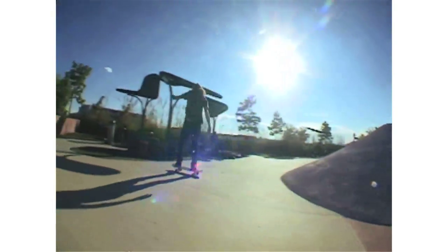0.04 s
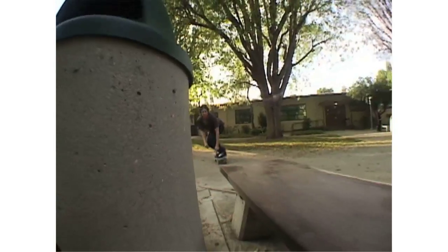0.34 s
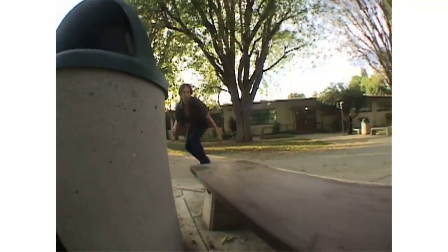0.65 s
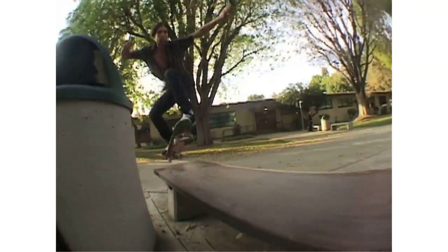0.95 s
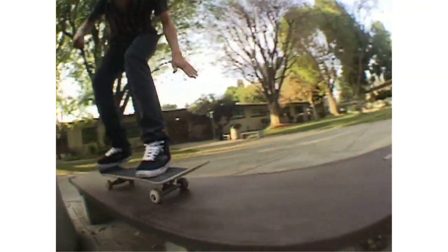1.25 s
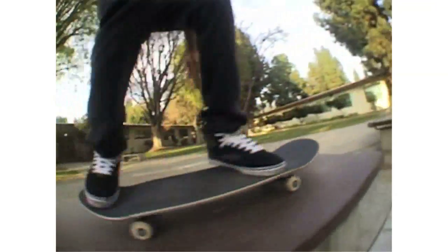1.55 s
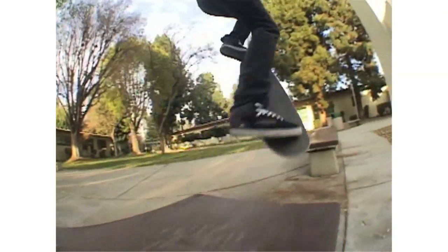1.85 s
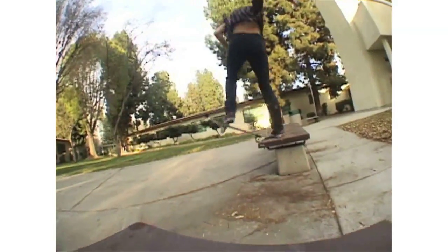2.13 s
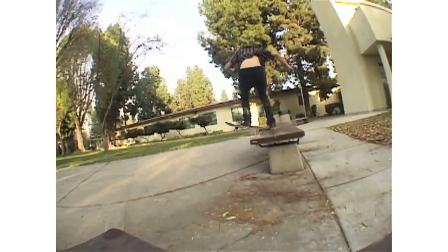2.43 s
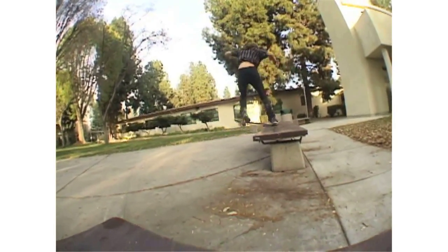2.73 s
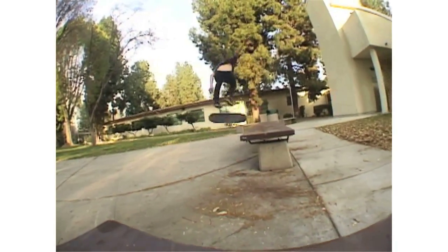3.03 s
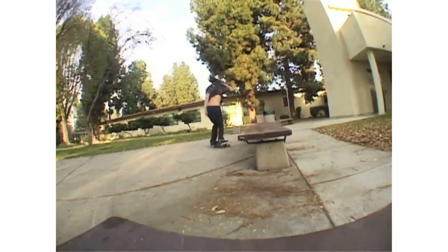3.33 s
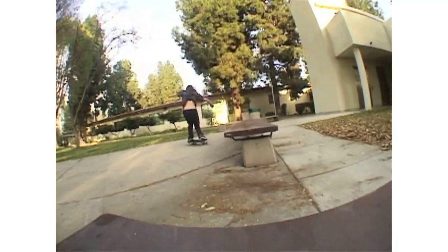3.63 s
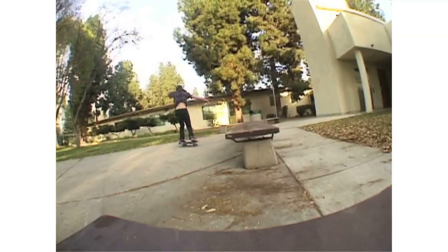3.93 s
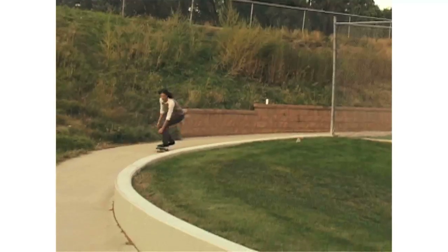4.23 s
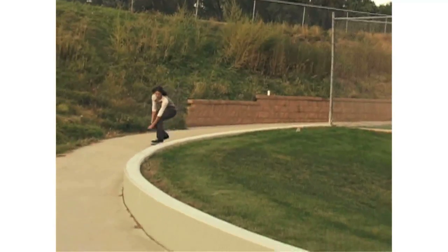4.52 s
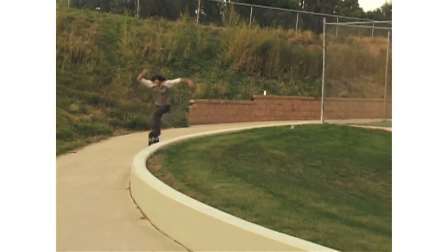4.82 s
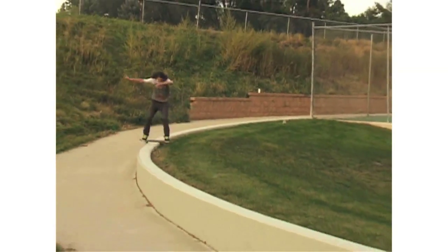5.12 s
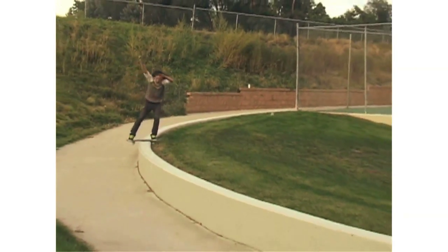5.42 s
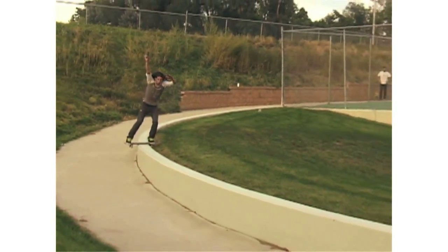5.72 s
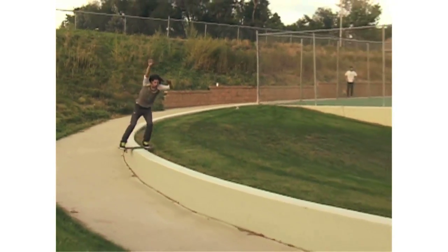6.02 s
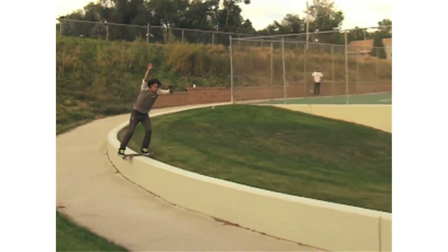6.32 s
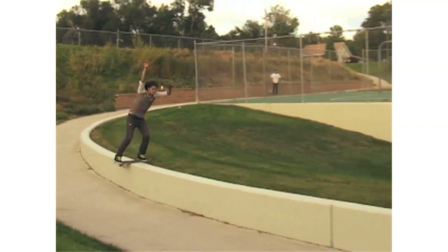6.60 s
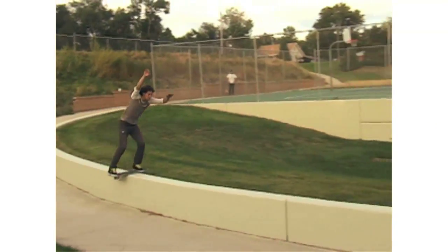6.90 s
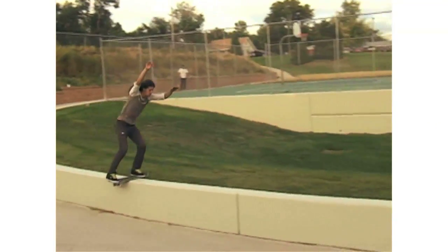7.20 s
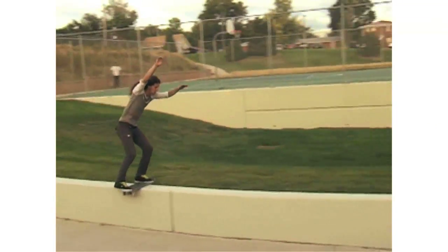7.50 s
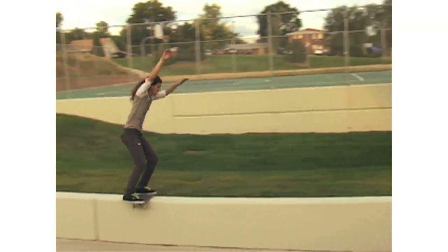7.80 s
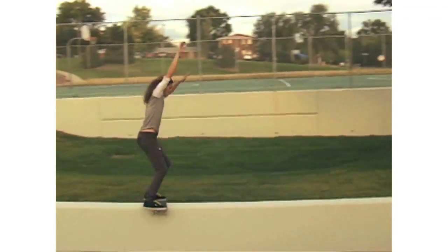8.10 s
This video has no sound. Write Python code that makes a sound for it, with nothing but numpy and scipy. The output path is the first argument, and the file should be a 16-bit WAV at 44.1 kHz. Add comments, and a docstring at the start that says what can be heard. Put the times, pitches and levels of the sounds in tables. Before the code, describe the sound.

A skateboard's wheels hum for an instant on smooth concrete, then rumble over gritty courtyard paving. At about 0.9 seconds the tail pops sharply, very close, and at 1.1 the board slams onto a bench; these are the loudest blows. The wheels rumble loudly past, with another wooden crack at 1.8. A landing clatters at 2.2, and softer knocks and slaps follow at 2.5, 2.8 and 3.3, echoing lightly as the rolling fades away.

At 4.1 seconds wheels roll softly along a concrete path under a faint, low breeze. A lighter pop comes at 4.9, and the metal truck lands on a concrete wall at 5.1. It chatters lightly, then digs in from 5.5 into a rough, gritty grind with a low rumble from the deck. Irregular metallic snags clank around 5.7, 6.4, 6.9 and 7.7. The grind continues, easing slightly, until the end just after 8 seconds.

```python
"""A moment of skateboard wheels humming on smooth concrete opens three outdoor runs. Next, in a
courtyard, the tail pops close by; the board rides a bench, lands and clatters away. Last comes a pop
onto a curved concrete wall and a long, rough grind. Wheels rumble over grit, blows ring the wooden
deck, and the metal truck sticks, slips and snags on the edge. Walls and trees echo over soft open air."""
import sys
import numpy as np
from scipy import signal
from scipy.fft import rfft, irfft
from scipy.io import wavfile
from scipy.ndimage import map_coordinates

SR = 44100
rng = np.random.default_rng(int(sys.argv[2]) if len(sys.argv) > 2 else 0)


def waveform_to_disk(signal):
    """Save audio, clipped to [-1, 1], as 16-bit WAV at the path in sys.argv[1]."""
    frames = np.transpose(np.atleast_2d(signal))
    scaled = np.clip(frames, -1, 1) * 32767
    samples = np.round(scaled).astype(np.int16)
    wavfile.write(sys.argv[1], SR, samples)


N = 359415
T = np.arange(N) / SR
TAPS = 4096
HZ = np.maximum(np.fft.rfftfreq(TAPS, 1 / SR), 1)

# stretches of rolling: start_s, end_s
PARK_SPAN, PAVING_SPAN, BENCH_SPAN = (-.1, .117), (.117, 1.1), (1.14, 2.14)
AWAY_SPAN, PATH_SPAN = (2.19, 4.1), (4.11, 5.08)
TURN_S = (5.9, 7)   # the curve of the wall turns the board side-on
# hard snags of the truck on the edge: start_s, peak_db, tilt_db_per_octave
SNAGS = [(5.1352, -28.5, 0), (5.366, -27, -1), (5.4705, -20.5, 0), (5.6127, -21.5, -3.5), (5.664, -17, -1),
         (5.686, -15, 2), (5.7175, -17, -2), (5.863, -18, -4), (6.3654, -19.5, -2), (6.6608, -20, -5),
         (6.8199, -16.5, 1.5), (6.8698, -15, 0), (6.9691, -19.5, -5), (7.7313, -17, -.5), (7.7838, -21, -1)]
# resonances of the truck on the wall: pitch_hz, width_hz, front_db, side_db
TRUCK_MODES = [(906, 175, -9, -0.5), (1126, 284, -4, 3.5), (1442, 285, 5.5, 2), (1730, 320, 1.5, -4),
               (2005, 390, 1.5, 4.5), (2500, 940, -9, -5.5), (3650, 510, -7.5, -11),
               (4270, 550, -11, -12.5), (5140, 830, -13.5, -23.5), (6100, 430, -27, -18.5),
               (6600, 290, -48.5, -56), (8730, 1800, -21.5, -22.5), (10700, 1100, -55.5, -55)]
# the rider's direction: time_s, left_lag_ms, blow_pan_db
DIRECTION = [(.3, -.03, 0), (1.1, -0.068, -.5), (1.6, 0.055, 0), (2.3, 0.04, -2.8), (3.2, 0.015, -1.5),
             (5, -0.022, 0)]


def board_blows():
    """Pops ring the free deck, other blows the loaded one; farther off they sound duller."""
    # the tail snaps on the ground: start_s, level_db, t60_s, tilt_db_per_octave
    pops = [(.855, -3, 0.047, -1.7), (.868, -12, 0.023, -2.5), (4.9225, -26.5, .03, 1.5),
            (4.927, -25.5, 0.052, 2.5)]
    # deck modes, free and under the rider, in the courtyard and by the wall: pitch_hz, width_hz, gain_db
    court_free = [(260, 110, -10.5), (530, 97, -11), (865, 120, -5), (1050, 130, -2.5), (1290, 140, -6),
                  (1593, 370, 4), (1747, 150, 4.5), (2326, 130, -0.5), (3214, 500, -16.5), (4200, 600, -14),
                  (5350, 500, -18.5), (8500, 950, -27)]
    wall_free = [(240, 120, -6), (1400, 390, -1.5), (1850, 130, 1), (2410, 51, 4.5), (4400, 360, -11),
                 (5100, 300, -15)]
    court_loaded = [(267, 220, -5), (540, 150, -1), (680, 33, -3.5), (790, 150, -2.5), (993, 130, 0.5),
                    (1293, 290, 1.5), (1600, 250, -6.5), (2020, 630, -4), (2630, 200, -5.5),
                    (3270, 620, -8), (4100, 1100, -13.5), (5210, 560, -9), (6900, 1500, -17),
                    (9600, 1300, -24.5)]
    wall_loaded = [(153, 91, -12), (540, 42, -11.5), (900, 63, -7), (1350, 96, 3.5), (1704, 65, 5),
                   (1940, 130, -14), (2290, 96, -4), (2960, 120, -4), (3600, 340, -6), (4020, 370, -2.5),
                   (5070, 400, -20), (7700, 700, -18.5)]
    out = np.zeros((2, N))
    _, pan_db = in_time(DIRECTION)
    for hits, court, wall in ((pops, court_free, wall_free), (contacts(), court_loaded, wall_loaded)):
        for s, level_db, t60, tilt_db in hits:
            if s > PATH_SPAN[0]:   # by the wall
                body = resonances(wall) * dulled(hz=6700)
                apart_hz, rise_s = 9000, .0014
            elif s > BENCH_SPAN[1]:   # riding away
                body = resonances(court) * dulled(hz=10400) * thinned(hz=222)
                apart_hz, rise_s = 5070, .0005
            else:   # close up
                body = resonances(court) * dulled(hz=12400) * thinned(hz=210) * thinned(hz=60)
                apart_hz, rise_s = 4300, .0009
            sound = blow(body, t60, tilt_db, click=.35, apart_hz=apart_hz, rise_s=rise_s)
            add(out, s, from_db(level_db) * panned(sound, pan_db[int(s * SR)]))
    return out


def contacts():
    """Every blow on the loaded board: start_s, level_db, t60_s, tilt_db_per_octave."""
    # a truck slaps down, wheel by wheel: start_s, level_db, t60_s, tilt_db_per_octave, second_wheel_db
    slaps = [(1.096, -3, .05, 0, 3), (1.123, -3, .06, -.5, -13), (1.793, -7.5, .03, 1, -12),
             (2.146, -15.3, .048, 0, -12), (2.1765, -17.5, .03, .5, -1), (2.483, -26.5, .08, -3.5, -3),
             (2.792, -34.5, .1, .8, 2.5), (3.251, -26, .05, 0, 7.5), (3.277, -23.5, .03, 1.5, -10)]
    # knocks of shoes and trucks, thumps of shifting weight: start_s, level_db, tilt_db_per_octave
    knocks = [(.741, -27, -4.5), (.84, -25.5, -6.5), (1.012, -26.5, -3.5), (1.189, -29, -1.5),
              (1.329, -23.5, -3.5), (2.261, -30, .5), (3.173, -37.5, .5), (3.203, -37.5, .5),
              (4.91, -40, -5), (5.084, -34, -5)]
    thumps = [(.70, -26, -9), (1.28, -25, -3), (1.674, -18, -9), (2.296, -26, -4.5), (2.85, -34, -4),
              (3.385, -39.5, -4)]
    # the truck lands on the wall: start_s, level_db, t60_s, tilt_db_per_octave
    lock_in = (5.0925, -22, .022, 2)
    hits = [lock_in]
    for s, level_db, t60, tilt_db, second_db in slaps:
        hits.append((s, level_db, t60, tilt_db))
        hits.append((s + .0092, level_db + second_db, t60 * 1.7, tilt_db - 3))   # later, longer, duller
    for table, t60 in ((knocks, .062), (thumps, .18)):
        hits += [(s, level_db, t60, tilt_db) for s, level_db, tilt_db in table]
    return hits


def blow(body, t60, tilt_db, click, apart_hz, rise_s=.001):
    """A hard first contact and a dying rattle of wheels and trucks ring the body."""
    t = T[:2 * TAPS]
    rattle = noise(len(t)) * from_db(-60 * t / t60) * (1 - np.exp(-t / rise_s))
    rattle[0, SR // 1000] += click * np.sqrt(np.sum(rattle[0] ** 2))
    tilt = from_db(tilt_db * np.log2(np.maximum(HZ, 200) / 1500))
    sound = filtered(stereo(rattle, apart_hz, bass_side=.0923), body * tilt)
    return rms_one(sound) * np.sqrt(.01 * SR / len(t))   # the energy of 10 ms at rms one


def grind():
    """The metal truck sticks and slips along the edge, crushing grit, snagging and shaking the deck."""
    # the truck bears on the wall, lightly, then with full weight: time_s, scrape_db
    pressure = [(5.11, -47.5), (5.45, -45), (5.55, -34.5), (5.8, -32.5), (6.15, -35.3), (6.95, -35.3),
                (8.15, -38.5)]
    start_s, lightest_db = pressure[0]
    scrape_db = in_time(pressure)[0] - 10 * bump(5.965, half_s=.025)   # it briefly loses its bite
    hiss_db = scrape_db + np.interp(T, TURN_S, [-7.5, -3])
    rumble_db = scrape_db + np.interp(T, TURN_S, [-11.5, -4.5])
    # only a lightly loaded truck chatters
    chatter_db = np.interp(scrape_db, [lightest_db, -38], [3.5, 0]) * (drift(45) - .5)
    slip_db = 2.6 * drift(120) + 1.4 * drift(26)   # quick slips, bunched into stutters
    ring = truck_ring(slip_db, flicker_db=2.9, wander_db=1.5)
    scrape = body_and_hiss(ring, scrape_db + chatter_db, hiss_db + chatter_db, split_hz=2340)
    rumble = deck_rumble(slip_db) * from_db(rumble_db)
    friction = (scrape + rasps(slip_db)) * from_db(sticking(depth_db=2.5, hold_s=.014))
    return (friction + rumble) * during((5.1, 9)) + snags(list(SNAGS) + catches(scrape_db, start_s))


def truck_ring(slip_db, flicker_db, wander_db):
    """Grit drives every resonance; the shifting contact point favours now one, now another."""
    side_on = np.interp(T, TURN_S, [0, 1])
    grains = [grit(per_s=3000, size_db=2.5, smooth=1.2) for _ in range(2)]
    forces = [stereo(pair, apart_hz=7560, bass_side=.033) * from_db(slip_db) for pair in grains]
    out = 0
    for k, (hz, width, front_db, side_db) in enumerate(TRUCK_MODES):
        band = signal.butter(2, [hz - width / 2, hz + width / 2], "band", fs=SR, output="sos")
        facing_db = front_db + side_on * (side_db - front_db)
        level_db = facing_db + flicker_db * drift(53) + wander_db * drift(7.6)
        out = out + signal.sosfilt(band, forces[k % 2] * from_db(level_db))
    # crushed grit fills the gaps between the resonances
    crunch = filtered(forces[0], dulled(hz=10000) * thinned(hz=600) / np.hypot(1, HZ / 4500))
    return out + from_db(-18) * crunch


def snags(hits, narrowing=.4, spread_db=3.5, crest_db=8.5):
    """Each snag strikes the truck, which rings freely: narrower resonances in a new balance."""
    out = np.zeros((2, N))
    for s, peak_db, tilt_db in hits:
        modes = [(hz, width * narrowing, front_db + spread_db * rng.standard_normal())
                 for hz, width, front_db, _ in TRUCK_MODES]
        body = resonances(modes) * dulled(hz=8400) / np.hypot(1, 500 / HZ)
        clank = blow(body, t60=.02, tilt_db=tilt_db, click=.14, apart_hz=8050)
        add(out, s, from_db(peak_db - crest_db) * clank)
    return out


def catches(scrape_db, start_s, per_s=9, above_db=10, spread_db=3):
    """Small random snags grow with the pressure on the truck: start_s, peak_db, tilt_db_per_octave."""
    gaps, sizes, colours = rng.random((60, 3)).T
    times = start_s + np.cumsum(.25 + 1.5 * gaps) / per_s
    return [(s, scrape_db[int(s * SR)] + above_db + spread_db * (2 * size - 1), -4.5 + 6 * colour)
            for s, size, colour in zip(times, sizes, colours) if s < T[-1]]


def sticking(depth_db, hold_s):
    """The scrape's dip in dB while the truck sticks, just before each hard snag lets go."""
    starts = np.append(np.array(SNAGS)[:, 0], np.inf)
    wait_s = starts[np.searchsorted(starts, T)] - T
    return -depth_db * np.exp(-(wait_s / hold_s) ** 2)


def rasps(slip_db):
    """Where the truck digs in, the slips drive a single resonance."""
    # hard bites: middle_s, half_length_s, pitch_hz, width_hz, level_db
    bites = [(5.7, 0.22, 1500, 330, -35), (6.97, 0.15, 5000, 1500, -40), (7.45, .14, 3400, 1200, -44),
             (7.85, .3, 540, 220, -45.5)]
    force = stereo(noise(), apart_hz=9000, bass_side=.1) * from_db(slip_db)
    out = 0
    for s, half_s, hz, width, level_db in bites:
        ring = rms_one(filtered(force, resonances([(hz, width, 0)]) ** 2))
        out = out + ring * from_db(level_db) * bump(s, half_s)
    return out


def deck_rumble(slip_db):
    """The slipping truck shakes a low rumble out of the deck."""
    # the shaken deck's spectrum: frequency_hz, gain_db
    deck_tone = [(18, -40), (30, -24), (63, 4.5), (108, 3), (189, 4.5), (346, -6.5), (523, -6),
                 (651, -13.5), (800, -3), (1040, -26), (1760, -120)]
    shake = stereo(noise(), apart_hz=5000, bass_side=.31) * from_db(1.05 * slip_db)
    return rms_one(filtered(shake, tone(deck_tone) * thinned(hz=72)))


def wheels():
    """The wheels roll over one surface after another, each with its own colour."""
    # swells of rolling: start_s, loudest_s, end_s, half_width_s, rumble_db, hiss_db
    paving_swells = [(.1, .2, .76, .95, -31.5, -42.5), (.87, 1.08, 1.1, .4, -42, -46)]   # the run-up, then spinning in the air
    bench_swells = [(1.25, 1.57, 1.81, .4, -26.2, -37.8), (1.9, 1.9, 2.1, .4, -53, -56)]   # on the bench, then spinning in the air
    away_swells = [(2.2, 2.25, 2.32, .12, -37, -56), (2.8, 2.9, 2.95, .2, -53, -74),
                   (3.3, 3.34, 3.4, .12, -48, -74), (3.5, 3.6, 4.1, .9, -65.5, -82)]
    path_swells = [(4.1, 4.2, 4.5, .9, -47.5, -60.5), (4.45, 4.59, 4.9, .3, -45, -55.5)]
    # colour of each surface: frequency_hz, gain_db
    paving_tone = [(24, -40.5), (40, -15.5), (135, 0), (277, -5), (478, -2), (910, -1.5), (1030, -1),
                   (1570, -13), (1920, -15), (2640, -25.5), (4230, -21), (6140, -35), (9840, -37),
                   (13600, -54), (15000, -59.5)]
    bench_tone = [(24, -58.5), (40, -29), (160, 0), (211, 2.5), (270, -4.5), (355, -1.5), (710, -7.5),
                  (1030, -3.5), (1870, -13), (2170, -14), (2920, -22), (6300, -31), (10100, -41),
                  (13900, -57), (15000, -60)]
    away_tone = [(24, -65), (40, -19), (142, -10), (186, -0.5), (364, -14), (422, -33), (514, 7), (612, -5),
                 (728, -3.5), (4680, -26.5), (5290, -31), (12300, -45), (15000, -65)]
    path_tone = [(24, -28), (40, -12), (108, 0), (233, -10), (270, -8), (401, -19), (514, -11), (643, -19),
                 (804, -10.5), (1140, -8.5), (1820, -17), (2110, -27), (4030, -18.5), (8480, -25.5),
                 (15000, -47)]
    park = park_roll(rumble_db=-46, wheel_hz=492, wheel_db=-42.5)
    paving = rolling(paving_swells, paving_tone, PAVING_SPAN,
                     wheel_hz=500, wheel_db=-11, bumpy_db=-.2, apart_hz=5000, bass_side=.3)
    bench = rolling(bench_swells, bench_tone, BENCH_SPAN,
                    wheel_hz=510, wheel_db=-8.5, bumpy_db=1.8, apart_hz=3000, bass_side=.08)
    away = rolling(away_swells, away_tone, AWAY_SPAN,
                   wheel_hz=510, wheel_db=-15, bumpy_db=2.5, apart_hz=3980, bass_side=.067)
    path = rolling(path_swells, path_tone, PATH_SPAN,
                   wheel_hz=520, wheel_db=4, bumpy_db=1.8, apart_hz=9000, bass_side=.27)
    return park + panned(paving, -1.2) + panned(bench, -.6) + panned(away, -2.1) + panned(path, -.56)


def rolling(swells, surface, span, wheel_hz, wheel_db, bumpy_db, apart_hz, bass_side):
    """Wheels run over grit, ticking sand and small bumps; wheel and axle hum at one resonance."""
    sand = from_db(-4.5) * filtered(grit(per_s=500, size_db=3.5, smooth=0), thinned(hz=5000))
    ground = grit(per_s=5000, size_db=3, smooth=1.1) + sand
    force = stereo(ground, apart_hz, bass_side) * from_db(bumpy_db * drift(35))
    sound = filtered(force, tone(surface) * (1 + resonances([(wheel_hz, 45, wheel_db)])))
    return body_and_hiss(sound, *roll_levels(swells), split_hz=2500) * during(span)


def roll_levels(swells, rise_db_per_s=90, rumble_fall_db_per_s=105, hiss_fall_db_per_s=50):
    """Rumble and hiss in dB swell as the board passes; the bearings hiss on after the rumble dies."""
    rumble = hiss = 1e-12
    for start, loudest, end, half_s, rumble_db, hiss_db in swells:
        swell_db = -10 * np.log10(1 + ((T - loudest) / half_s) ** 2)
        onset_db = -rise_db_per_s * np.maximum(start - T, 0)
        since = np.maximum(T - end, 0)
        rumble_shape_db = onset_db + swell_db - rumble_fall_db_per_s * since
        hiss_shape_db = onset_db + 2 * swell_db - hiss_fall_db_per_s * since
        rumble = np.maximum(rumble, from_db(rumble_db + rumble_shape_db))
        hiss = np.maximum(hiss, from_db(hiss_db + hiss_shape_db))
    return 20 * np.log10(rumble), 20 * np.log10(hiss)


def park_roll(rumble_db, wheel_hz, wheel_db):
    """On smooth concrete the wheels rumble softly and sing one slightly unsteady note."""
    # colour of the concrete: frequency_hz, gain_db
    park_tone = [(24, -39), (40, -13), (178, -7), (284, -15), (499, -15), (538, -10), (1020, -20),
                 (1180, -19), (1740, -24), (14000, -49.5)]
    rumble = rms_one(filtered(stereo(noise(), apart_hz=4000, bass_side=.19), tone(park_tone)))
    note = np.sin(2 * np.pi * np.cumsum(wheel_hz * (1 + .016 * drift(15))) / SR)
    return (from_db(rumble_db) * rumble + from_db(wheel_db) * note) * during(PARK_SPAN)


def scuffs():
    """Sand hisses under sliding wheels."""
    # sideways slides: middle_s, half_length_s, level_db
    slides = [(.16, .06, -44), (1.48, .02, -40.5), (1.55, .02, -41.5), (2.26, .035, -45.5),
              (2.87, .03, -54), (3.79, .03, -66)]
    grains = stereo(grit(per_s=3000, size_db=3, smooth=.6), apart_hz=5000, bass_side=.1)
    sand = filtered(grains, resonances([(8000, 6000, 0)]) * dulled(hz=10500))
    return rms_one(sand) * sum(from_db(level_db) * bump(s, half_s) for s, half_s, level_db in slides)


def grit(per_s, size_db, smooth):
    """Tiny collisions with grains of very uneven size, on a smooth friction noise."""
    sizes = (rng.random(N) < per_s / SR) * from_db(size_db * np.minimum(rng.exponential(1, N), 4))
    return rms_one(rms_one(sizes * noise()) + smooth * noise())


def echoes(x, t60, treble_t60):
    """Walls and trees scatter the sound: each octave swells, then dies as noise, the treble first."""
    # colour of the echo: frequency_hz, gain_db
    echo_tone = [(100, -1.5), (250, 2), (500, 3), (1000, -0.5), (2500, 0.5), (5000, -1), (12000, -15)]
    out, edges = 0, np.geomspace(90, 14000, 8)
    diffuse = [stereo(noise(), apart_hz=3500, bass_side=.22) for _ in range(2)]
    for k, band_hz in enumerate(zip(edges, edges[1:])):
        band = signal.butter(2, band_hz, "band", fs=SR, output="sos")
        centre_hz = np.sqrt(np.prod(band_hz))
        energy = signal.sosfilt(band, x.mean(axis=0) + 1e-9 * diffuse[0][0]) ** 2
        for seconds in (.06, np.interp(centre_hz, [500, 8000], [t60, treble_t60])):   # swell, decay
            keep = from_db(-120 / (seconds * SR))
            energy = signal.lfilter([1 - keep], [1, -keep], energy)
        wash = rms_one(signal.sosfilt(band, diffuse[k % 2]))
        out = out + np.interp(centre_hz, HZ, tone(echo_tone)) * np.sqrt(energy) * wash
    return out


def breeze(level_db):
    """Open air rumbles softly around the wall."""
    colour = resonances([(85, 90, 0)]) * dulled(hz=300) * thinned(hz=55)
    rumble = filtered(stereo(noise(), apart_hz=3000, bass_side=.4), colour)
    return from_db(level_db) * rms_one(rumble) * during((PATH_SPAN[0], 9))


def outdoor_air(level_db):
    """A steady, low wash of distant outdoor noise."""
    # colour of the background: frequency_hz, gain_db
    air_tone = [(15, -39), (25, -13), (81, 5), (196, 1.5), (293, -7), (335, -3), (450, -19.5), (515, -12),
                (833, -12.5), (2500, -24.5), (15000, -43.5)]
    wash = filtered(stereo(noise(), apart_hz=3000, bass_side=.4), tone(air_tone))
    return from_db(level_db) * rms_one(wash)


def from_direction(x):
    """Sound reaches the nearer side first."""
    lag_ms, _ = in_time(DIRECTION)
    left = map_coordinates(x[0], [np.arange(N) - lag_ms * SR / 1000], order=3, mode="nearest")
    return np.stack([left, x[1]])


def stereo(pair, apart_hz, bass_side):
    """Two unrelated signals become left and right: alike in the bass, parting in the treble."""
    side = filtered(pair[1:], np.hypot(bass_side, HZ / np.hypot(HZ, apart_hz)))
    return pair[:1] + side * [[1], [-1]]


def panned(x, db):
    """Lean to the left by db."""
    return x * from_db(np.array([[db], [-db]]) / 2)


def body_and_hiss(x, body_db, hiss_db, split_hz):
    """The lower and the upper part of a friction sound, each at its own level."""
    lowpass = np.fft.fftshift(irfft(dulled(split_hz)))
    body = signal.oaconvolve(x, lowpass[None], axes=-1)[:, TAPS // 2:TAPS // 2 + N]
    return rms_one(body) * from_db(body_db) + rms_one(x - body) * from_db(hiss_db)


def filtered(x, gain):
    """Causal, minimum-phase filter with the given gain curve."""
    cepstrum = irfft(np.log(gain + 1e-6))[:TAPS // 2]
    cepstrum[1:] *= 2
    response = irfft(np.exp(rfft(cepstrum, TAPS)))
    return signal.oaconvolve(x, np.atleast_2d(response), axes=-1)[:, :x.shape[-1]]


def resonances(modes):
    """Gain curve of a body with these modes: pitch_hz, width_hz, gain_db."""
    return np.sqrt(sum(from_db(db) ** 2 / (1 + ((HZ ** 2 - hz ** 2) / (HZ * width)) ** 2)
                       for hz, width, db in modes))


def tone(points):
    """Gain curve through the points of a spectrum."""
    hz, db = np.transpose(points)
    return from_db(np.interp(np.log(HZ), np.log(hz), db))


def dulled(hz):
    """Gain curve of a steep loss of treble."""
    return 1 / np.hypot(1, (HZ / hz) ** 4)


def thinned(hz):
    """Gain curve of a small source that radiates little bass."""
    return 1 / np.hypot(1, (hz / HZ) ** 2)


def noise(length=N):
    """Two unrelated white noises."""
    return rng.standard_normal((2, length))


def drift(rate_hz, step=40):
    """A smooth random wander with a spread of one."""
    pole = np.exp(-2 * np.pi * step * rate_hz / SR)
    slow = signal.lfilter([1], [1, -2 * pole, pole ** 2], rng.standard_normal(N // step + 2002))[2000:]
    return np.interp(np.arange(N) / step, np.arange(len(slow)), rms_one(slow))


def in_time(rows):
    """Each column of a curve at every sample."""
    s, *columns = np.transpose(rows)
    return [np.interp(T, s, column) for column in columns]


def during(span):
    """One inside the span, with 6 ms fades."""
    start, end = span
    return np.interp(T, [start - .003, start + .003, end - .003, end + .003], [0, 1, 1, 0])


def bump(s, half_s):
    """A smooth rise to one at s and back."""
    return np.exp(-np.minimum(((T - s) / half_s) ** 2, 50))


def add(out, s, sound):
    """Mix a sound in at its time."""
    start = int(s * SR)
    out[:, start:start + sound.shape[1]] += sound[:, :N - start]


def from_db(db):
    """Decibels to gain."""
    return 10 ** (np.asarray(db) / 20)


def rms_one(x):
    """Scale to an rms of one."""
    return x / np.sqrt(np.mean(x ** 2) + 1e-20)


def scene():
    """Rolling, echoing blows and the grind, over the outdoor background."""
    roll = wheels()
    air = outdoor_air(level_db=-60.5) + breeze(level_db=-51)
    sand = panned(scuffs(), -2.1)
    blows = board_blows()
    court = blows * (T < PATH_SPAN[0])
    wall = blows * (T >= PATH_SPAN[0]) + grind()
    # a near board sends far less echo for its loudness than a distant one
    echo_send = np.where(T < BENCH_SPAN[1], from_db(-24), from_db(-12))
    court_echo = echoes(court * echo_send, t60=.77, treble_t60=.6)
    wall_echo = from_db(-20.5) * echoes(wall, t60=.7, treble_t60=.17)
    return from_direction(roll + sand + court + wall) + court_echo + wall_echo + air


def record(dry, ceiling=.48, cutoff_hz=15300):
    """The nearest blows overload the microphone; the top treble is cut."""
    saturated = dry / (1 + (dry / ceiling) ** 6) ** (1 / 6)
    return signal.sosfilt(signal.cheby2(16, 70, cutoff_hz, fs=SR, output="sos"), saturated)


dry = scene()
out = record(dry)
waveform_to_disk(out)
```